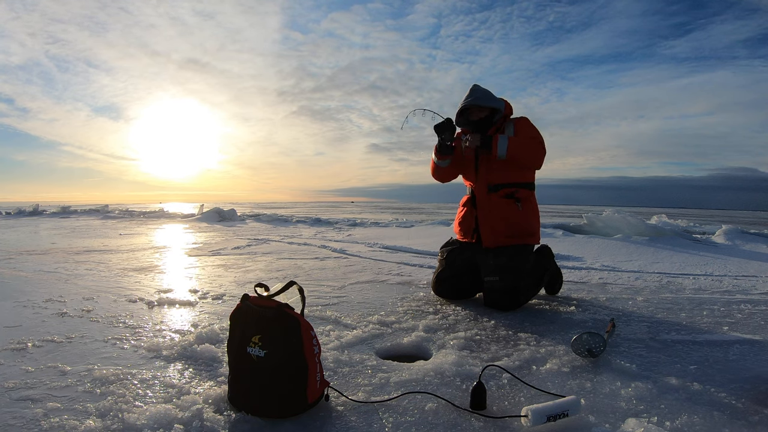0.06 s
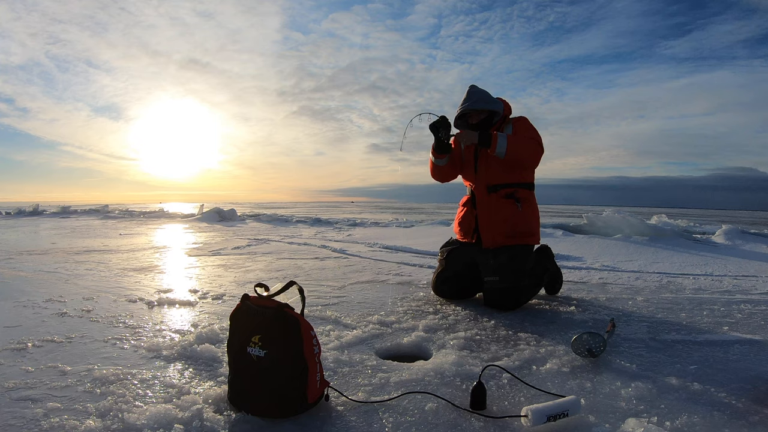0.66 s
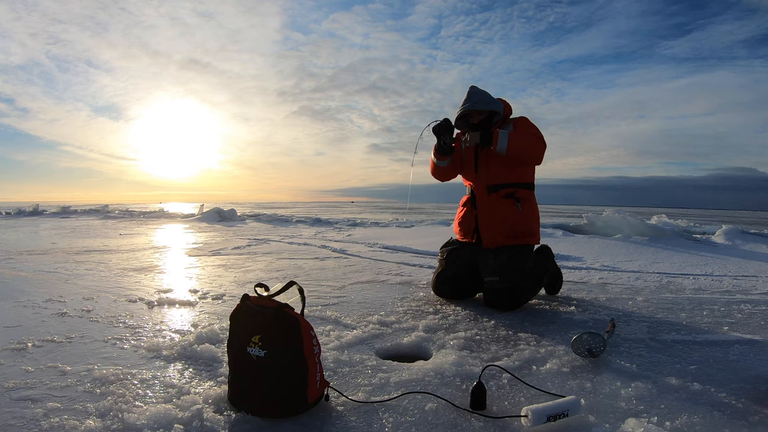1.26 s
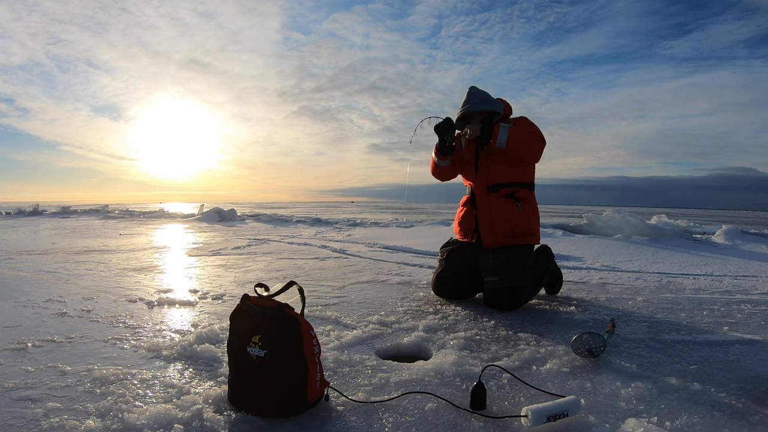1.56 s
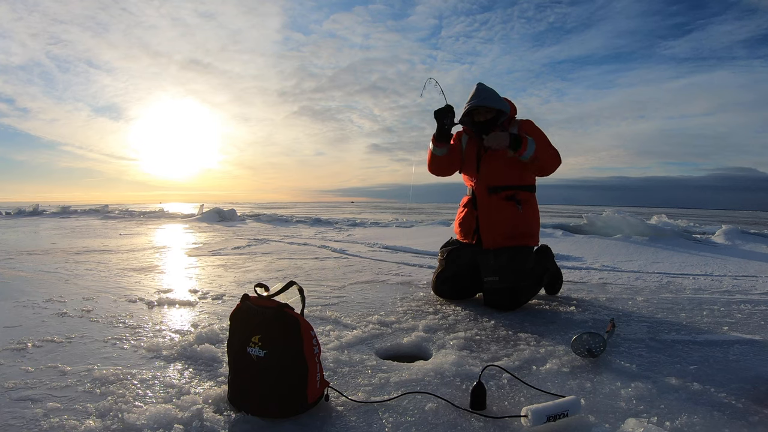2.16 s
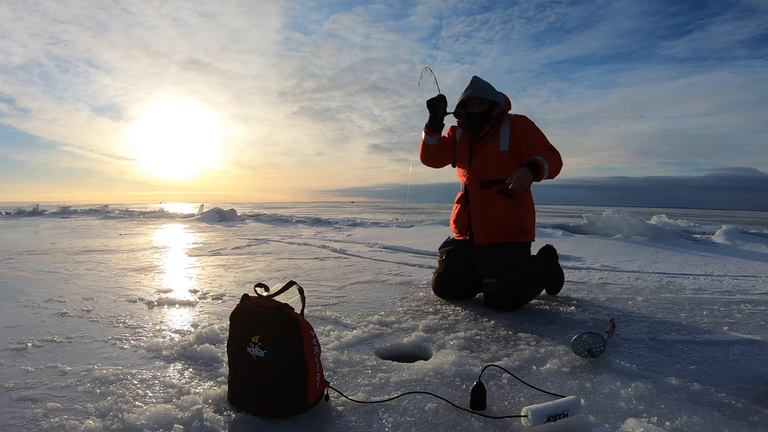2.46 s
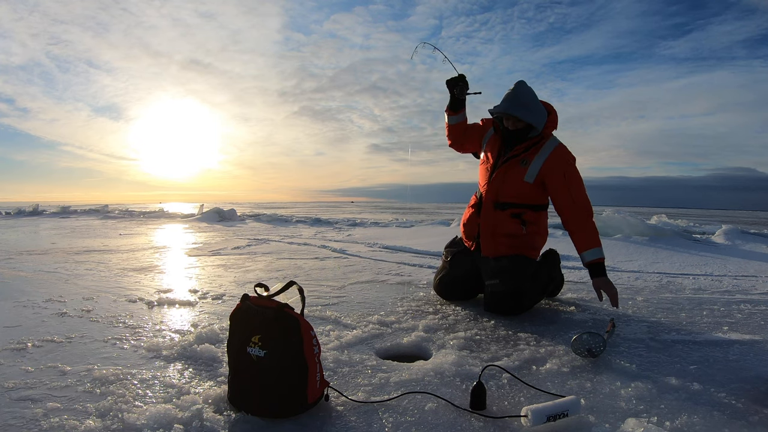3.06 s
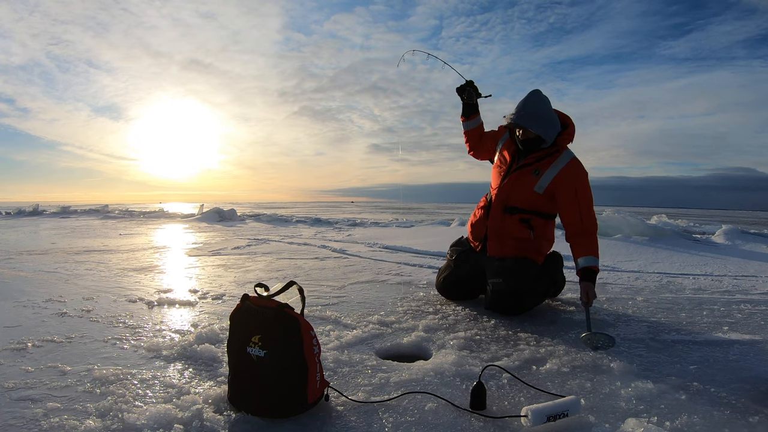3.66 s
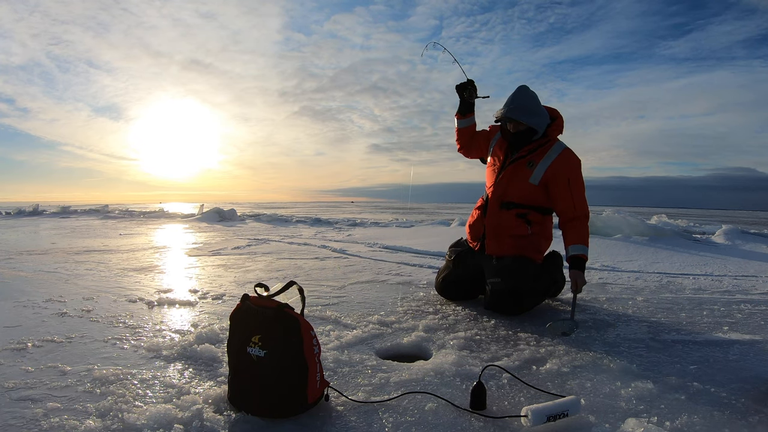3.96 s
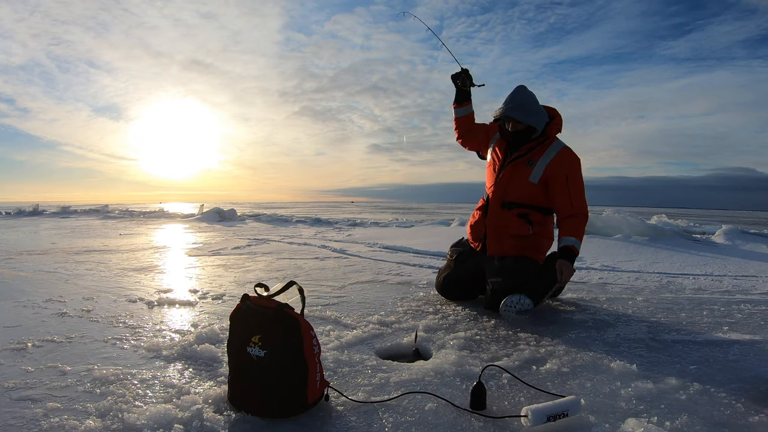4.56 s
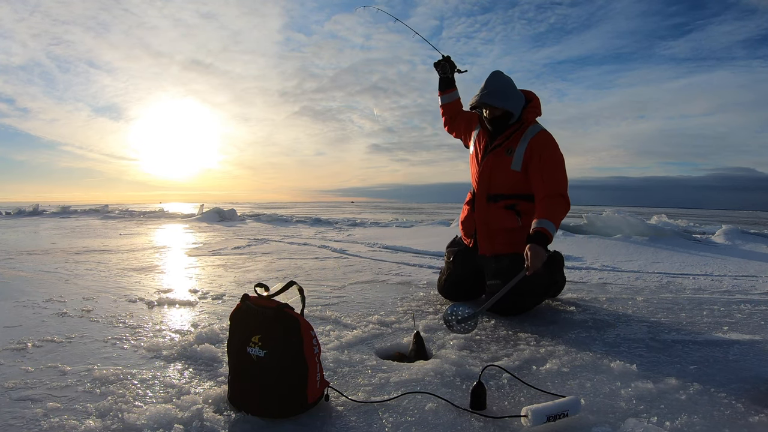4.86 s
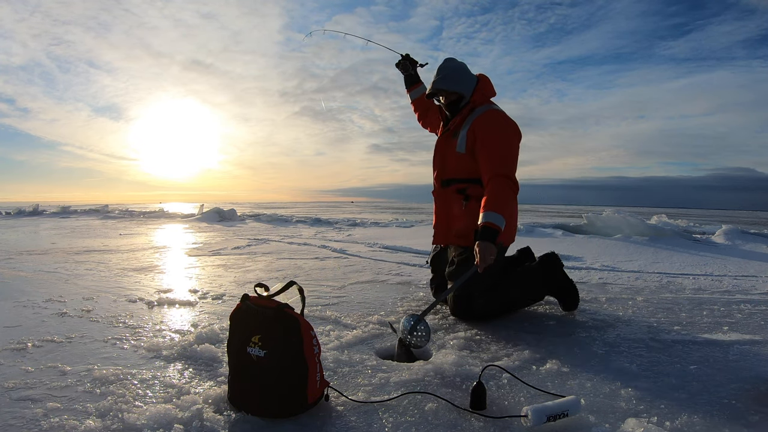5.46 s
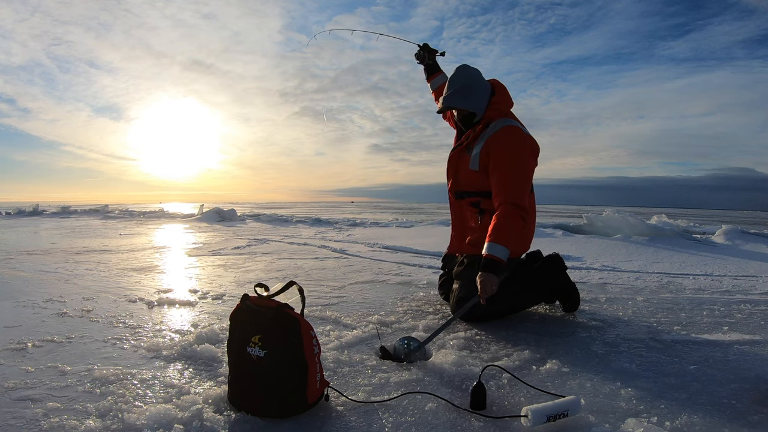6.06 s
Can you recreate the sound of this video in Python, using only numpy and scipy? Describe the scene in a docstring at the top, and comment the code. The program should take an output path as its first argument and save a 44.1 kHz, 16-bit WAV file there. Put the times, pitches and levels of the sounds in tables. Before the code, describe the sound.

Light wind rumbles on the microphone throughout, out on a frozen lake. A distant motor hums low, rising slightly in pitch, then sinking and fading after about 3.4 seconds. For the first 1.5 seconds, a nearby fishing reel whirrs and ticks quietly in short turns. From about 2.4 to 3.3 seconds, the angler's knees shift on crusted snow: grains crunch, thin plates snap sharply and packed snow thuds softly. A metal skimmer clinks brightly as it is picked up at about 3.4 seconds, and again near 4.1. From 4.7 to 5.7 seconds comes a second, fuller stretch of crunching and cracking. From about 5.8 seconds, the skimmer knocks and scrapes in the slushy hole with damped metallic taps, while water drips off it and makes small ringing bubbles until the end, at about 6.3 seconds.

```python
"""On a frozen lake, light wind rumbles on the microphone and a far motor hums throughout.
First an angler, kneeling by a hole, winds the reel a little: its gears whirr and tick.
Then the knees shift over crusted snow: grains crunch, plates of crust snap, packed snow thuds.
A metal skimmer (a scoop for slush) clinks as it is picked up, and the snow crunches again.
Last, the skimmer scrapes in the slushy hole, and water drips off it and makes ringing bubbles."""
import sys
import numpy as np
from scipy import signal
from scipy.fft import rfft, irfft
from scipy.io import wavfile
from scipy.ndimage import uniform_filter1d

SR = 44100
rng = np.random.default_rng(int(sys.argv[2]) if len(sys.argv) > 2 else 0)


def generate_wav(signal):
    """Clip the signal to [-1, 1] and save it as 16-bit WAV at the path in sys.argv[1]."""
    frames = np.transpose(np.atleast_2d(signal))
    scaled = np.clip(frames, -1, 1) * 32767
    pcm = np.round(scaled).astype(np.int16)
    wavfile.write(sys.argv[1], SR, pcm)


N = 278712
TIME = np.arange(N) / SR


def from_db(db):
    """Turn decibels into a number to multiply by."""
    return 10 ** (np.asarray(db) / 20)


def rms_one(x):
    """Scale a sound so that its average strength (rms) is 1."""
    return x / np.sqrt(np.mean(x ** 2) + 1e-20)


def in_time(rows):
    """Join (time_s, values...) rows with straight lines: one curve per value column."""
    times, *columns = np.transpose(sorted(map(tuple, rows)))
    return [np.interp(TIME, times, column) for column in columns]


def add(track, start_s, sound):
    """Mix a short sound into a track."""
    start = int(np.clip(round(start_s * SR), 0, N - 1))
    track[start:start + len(sound)] += sound[:N - start]


def keep_band(x, low_hz, high_hz):
    """Turn down everything below and above a band of pitches."""
    return signal.sosfilt(signal.butter(2, [low_hz, high_hz], "band", fs=SR, output="sos"), x)


def colour(x, spectrum, tilt_db=0, size=4096):
    """Shape a sound's tone with (pitch_hz, level_db) rows, tilted by tilt_db per octave."""
    octave = np.log2(np.maximum(np.arange(size // 2 + 1) * SR / size, 1))
    hz, db = np.transpose(spectrum)
    tilt = tilt_db * np.clip(octave - np.log2(hz).mean(), -2, 2)
    level = np.interp(octave, np.log2(hz), db) + tilt
    # Folding makes a minimum-phase filter: nothing rings ahead of a click.
    cepstrum = irfft(np.log(from_db(level)))
    fold = 1 + np.sign(size // 2 - np.arange(size)) - (np.arange(size) == 0)
    return signal.fftconvolve(x, irfft(np.exp(rfft(cepstrum * fold))))[:len(x)]


def noise(spectrum):
    """Steady noise with the given tone, at strength 1."""
    return rms_one(colour(rng.standard_normal(N + SR), spectrum)[SR:])


def wide_noise(spectrum, apart):
    """Stereo noise; apart runs from 0 (both sides alike) to 1 (each side its own)."""
    shared = noise(spectrum)
    own = np.array([noise(spectrum), noise(spectrum)])
    return np.sqrt(1 - apart) * shared + np.sqrt(apart) * own


def drift(per_s):
    """A curve that wanders around zero, to a new random value per_s times a second."""
    return np.interp(TIME * per_s, np.arange(N), rng.standard_normal(N))


def swells(events, rise_db_per_s, fall_db_per_s):
    """A level in dB: each event rises until start_s, holds, then falls; overlaps add up."""
    power = 1e-14
    for start_s, hold_s, db in events:
        before_s = np.clip(start_s - TIME, 0, 1)
        after_s = np.clip(TIME - start_s - hold_s, 0, 1)
        power = power + from_db(db - rise_db_per_s * before_s - fall_db_per_s * after_s) ** 2
    return 10 * np.log10(power)


def ring(x, hz, ring_s):
    """Each click in x starts a pure tone that fades by 60 dB in ring_s."""
    decay = from_db(-60 / (ring_s * SR))
    angle = 2 * np.pi * min(hz, SR / 2 - 1) / SR
    return signal.lfilter([0, np.sin(angle)], [1, -2 * decay * np.cos(angle), decay ** 2], x + 1e-18)


def grains(per_s, spread_db, clump_db, size=3000):
    """Random clicks of uneven size, in clumps; their average level is evened out."""
    sizes = from_db(spread_db * np.minimum(rng.exponential(1, N), 4)) * rng.choice([-1, 1], N)
    clicks = sizes * (rng.random(N) < per_s / SR) * from_db(clump_db * drift(160))
    return clicks / np.sqrt(np.abs(uniform_filter1d(clicks ** 2, size=size)) + 0.00042)


def struck(tones, contacts, focus_db, lead_db, grit_db, uneven_db, wet_sag=0.0325, size=8000):
    """Each contact is a scuff of tiny hits that favours one tone; slush lowers and damps the ring."""
    out, t = np.zeros(N), np.arange(size) / SR
    for start_s, db, lead_hz, scuff_s, wet in contacts:
        scuff = rng.standard_normal(size) * np.exp(-t / scuff_s) * (rng.random(size) < .3)
        octaves_off = np.abs(np.log2(np.array(tones)[:, 0] / lead_hz))
        drive_db = lead_db * (octaves_off == octaves_off.min()) - focus_db * octaves_off
        drive_db += uneven_db * rng.standard_normal(len(tones))
        metal = 0
        for (hz, tone_db, ring_s), drive in zip(tones, drive_db):
            tone = ring(scuff, hz * (1 - wet_sag * wet), ring_s * np.exp(-wet))
            metal += from_db(tone_db + drive) * rms_one(tone)
        grit = keep_band(scuff, lead_hz / 3, min(lead_hz * 2, SR / 3))
        clink = rms_one(metal) + from_db(grit_db) * rms_one(grit)
        add(out, start_s, from_db(db) * clink / np.abs(clink).max())
    return out


def many_paths(x, level_db, fade_s, size):
    """A sound reaches each side by its own tiny echoes, which fade by 60 dB in fade_s."""
    paths = rng.standard_normal((2, size)) * from_db(-60 * np.arange(size) / SR / fade_s)
    paths /= np.sqrt(np.sum(paths[0] ** 2))
    return from_db(level_db) * signal.fftconvolve(x[None], paths)[:, :N]


def ice_echo(x, treble_hz=6500):
    """Rough ice throws back a brief wash of treble, different on each side."""
    treble = signal.sosfilt(signal.butter(1, treble_hz, "high", fs=SR, output="sos"), x)
    return many_paths(treble, level_db=-11, fade_s=0.045, size=4000)


def microphone_ports(x):
    """The microphone has two openings: the left hears less, and its resonances delay some treble."""
    # Resonances of the left opening: pitch_hz, width_hz
    resonances = [(9100, 220), (11800, 2940)]
    # Balance between the openings: pitch_hz, left_minus_right_db
    balance = [(60, -2.5), (200, -2), (380, -3), (700, -5), (2400, -4.7), (4400, -3.3), (7500, -.5),
               (10000, -5), (15000, -5)]
    left = x
    for hz, width_hz in resonances:
        decay = np.exp(-np.pi * width_hz / SR)
        poles = [1, -2 * decay * np.cos(2 * np.pi * hz / SR), decay ** 2]
        left = signal.lfilter(poles[::-1], poles, left)
    left = colour(left, [(hz, db / 2) for hz, db in balance])
    right = colour(x, [(hz, -db / 2) for hz, db in balance])
    return np.array([left, right])


def air(wind_db=4.0, wind_pan_db=2.0, lumpy_db=3.0, hiss_db=-73, hiss_pan_db=3.0):
    """A lumpy breeze and its gusts buffet the microphone, more on the right, over a faint hiss."""
    # The breeze between gusts: time_s, level_db
    breeze_levels = [(0, -57.5), (1.8, -52), (3.1, -54.5), (4.0, -53.5), (5.2, -66), (5.8, -60), (6.2, -52)]
    # Gusts: start_s, hold_s, level_db
    gust_events = [(.08, 0.074, -42.5), (.7, 0.09, -47), (1.1, 0.24, -49), (2.23, 0.054, -45.5),
                   (2.55, .23, -48), (3.66, 0.055, -51.5), (4.14, 0.29, -46.5), (5.39, 0.2, -52.5)]
    # Tone of the wind: pitch_hz, level_db
    wind_tone = [(15, 0), (28, -1.5), (62, 4.5), (105, 1.5), (150, -11), (250, -14.5), (500, -64)]
    # Tone of the hiss: pitch_hz, level_db
    hiss_tone = [(590, -12), (1000, -1.5), (1350, -19), (1480, -3.5), (2010, -21), (4700, -19), (5040, -16),
                 (6410, -18), (7530, -8), (8940, -25), (15500, -67)]
    breeze = from_db(in_time(breeze_levels)[0] + lumpy_db * drift(8.3))
    gusts = from_db(swells(gust_events, rise_db_per_s=283, fall_db_per_s=174))
    wind = np.hypot(breeze, gusts) * wide_noise(wind_tone, apart=0.54)
    hiss = wide_noise(hiss_tone, apart=1.0)
    side = np.array([[-1], [1]])   # left, right
    return from_db(wind_db + wind_pan_db * side) * wind + from_db(hiss_db + hiss_pan_db * side) * hiss


def far_rumble():
    """A low rumble from across the open lake gently rises and falls."""
    # Strength of the rumble: time_s, level_db
    levels = [(0, -51.5), (.7, -53.5), (2, -48.5), (3.2, -51.5), (4, -51), (4.6, -50.5), (6.32, -52)]
    # Its tone: pitch_hz, level_db
    tone = [(40, -14), (110, 1.5), (200, -0.5), (300, -9), (420, -18), (750, -24.5), (1100, -47.5),
            (2500, -53.5)]
    return from_db(in_time(levels)[0]) * noise(tone)


def far_motor(waver=0.0039, flutter_db=-0.1):
    """A far motor slowly gains speed, then slows and fades; the air makes its tones waver."""
    # The motor's hum: time_s, pitch_hz, main_level_db, upper_level_db
    hum = [(0, 160, -58, -77), (.3, 162.5, -46, -75), (.75, 164, -44.5, -56), (1.3, 166.5, -42, -55),
           (1.9, 168.5, -47, -53.5), (2.4, 170, -46, -59), (2.9, 172, -46, -62.5), (3.3, 174.5, -47.5, -59),
           (3.6, 164, -63.5, -61), (4.15, 159, -52, -71), (4.6, 150, -64.5, -63), (6.32, 148, -62, -67.5)]
    # Its upper tones: ratio_to_main_pitch, level_db
    upper_tones = [(1.385, -4), (1.63, -1)]
    hz, main_db, upper_db = in_time(hum)
    tones = [(1, main_db)] + [(ratio, upper_db + db) for ratio, db in upper_tones]
    phase = 2 * np.pi * np.cumsum(hz * (1 + waver * drift(12))) / SR
    return np.sqrt(2) * sum(from_db(db + flutter_db * drift(9.3)) * np.sin(ratio * phase)
                            for ratio, db in tones)


def reel(whirr_db=-6.0, rattle_db=-8.5, rattle_hz=2500, rattle_focus_db=14, tick_cycles=16):
    """As the handle turns, gears whirr and their teeth set the reel ringing; at times it ticks."""
    # Ticks and clacks: start_s, level_db, favoured_pitch_hz
    tick_events = [(.052, -48.5, 9250), (.088, -55, 2400), (.373, -51, 9250), (0.397, -49, 2400),
                   (.487, -46.5, 8900), (.5995, -47, 8900), (.8265, -46.5, 8900), (1.06, -36, 2400),
                   (1.125, -44.5, 2400), (1.1553, -49, 9900), (1.245, -45, 2400), (1.3603, -42.5, 9250)]
    # Tones the reel rings with: pitch_hz, level_db, ring_s
    tones = [(900, 9, 0.035), (1250, -17, 0.025), (1710, -15, 0.015), (2400, -7, 0.012), (3040, -10, 0.12),
             (3890, -10, 0.032), (5561, -10.5, 0.083), (6400, -12, .02), (8900, -5, 0.028),
             (9250, -16, 0.033), (9900, -26, .02)]
    # Tone of the gears' whirr: pitch_hz, level_db
    whirr_tone = [(700, -22), (1250, -16), (2000, -11.5), (2280, -3), (2480, 2), (2750, -11), (3700, -12),
                  (5000, -17.5), (9000, -22.5), (14000, -44)]
    # Turns of the handle: start_s, hold_s, level_db
    turns = [(.09, 0.31, -63), (.45, 0.19, -65), (1.04, .23, -62), (1.32, 0.24, -69.5)]
    contacts = [(start_s, db, hz, tick_cycles / hz, 0) for start_s, db, hz in tick_events]
    ticks = struck(tones, contacts, focus_db=15.0, lead_db=4, grit_db=-8.5, uneven_db=2)
    whirr = rms_one(colour(grains(per_s=560, spread_db=0.0, clump_db=3.5), whirr_tone))
    teeth = grains(per_s=130, spread_db=0.0, clump_db=7.0)
    rattle = 0
    for hz, db, ring_s in tones:
        octaves_off = abs(np.log2(hz / rattle_hz))
        rattle += from_db(db - rattle_focus_db * octaves_off) * rms_one(ring(teeth, hz, ring_s))
    turning = from_db(swells(turns, rise_db_per_s=258, fall_db_per_s=204))
    return ticks + turning * (from_db(whirr_db) * whirr + from_db(rattle_db) * rms_one(rattle))


def bubbles(onset_s=0.0015, wobble=0.021, trickle_db=-38, low_hz=520, high_hz=5000, size=6000):
    """Bubbles ring, wobble and rise in pitch near the surface; drips off the skimmer add small ones."""
    # Big bubbles in the hole: start_s, level_db, pitch_hz, rise_octaves_per_s, ring_s
    big_bubbles = [(5.801, -36.5, 1050, 5, 0.058), (5.88, -36, 1160, 12, 0.1),
                   (5.94, -50.5, 2070, 16, 0.19), (6.176, -33, 1160, 3.6, 0.056),
                   (6.199, -36, 1720, 14, 0.028), (6.231, -30, 560, 3.1, 0.025),
                   (6.242, -32, 2650, 4, 0.033), (6.275, -35, 576, 5.4, .031), (6.3, -40.5, 650, 5, 0.029)]
    out, t = np.zeros(N), np.arange(size) / SR
    trickle = []
    for when, loud, small in rng.random((34, 3)):
        hz = low_hz * (high_hz / low_hz) ** small
        trickle.append((6.14 + .18 * when, trickle_db + 10 * (loud - .5), hz, 7, 36 / hz))
    for start_s, db, hz, rise, ring_s in big_bubbles + trickle:
        fade = from_db(db - 60 * t / ring_s) * (1 - np.exp(-t / onset_s))
        unsteady = 1 + wobble * np.interp(t * 300, np.arange(size), rng.standard_normal(size))
        pitch_hz = hz * unsteady * 2 ** (rise * t)
        add(out, start_s, fade * np.sin(2 * np.pi * np.cumsum(pitch_hz) / SR))
    return out


def skimmer(bounce_s=0.021, bounce_db=-19, loss_db=2):
    """The metal scoop is picked up, knocked on ice and dipped in slush; each contact bounces twice."""
    # Tones the scoop rings with: pitch_hz, level_db, ring_s
    tones = [(992, 5.5, 0.16), (1217, -5.5, 0.068), (2266, -7, 0.063), (2560, -6, 0.091),
             (3560, -7.5, 0.04), (4120, -10, 0.032), (4700, -0.5, 0.061), (4570, -6, 0.047),
             (5000, -4, 0.014), (5330, -12, .04), (6150, -8.5, 0.04), (7095, -16, 0.099), (7316, -31, .075),
             (7461, 1, 0.033), (7800, 4.5, 0.033), (8540, -3, 0.14), (8620, 5, 0.011), (9250, 2.5, 0.048),
             (9660, -12, 0.08), (10300, -8, 0.069), (11800, -14, .05)]
    # Its contacts: start_s, level_db, favoured_pitch_hz, scuff_s, wetness (0 to 1)
    clinks = [(3.4291, -17.5, 4740, 0.0058, 0.06), (3.4305, -17.5, 7316, 0.0049, 0.05),
              (3.52, -37, 4700, 0.017, 0.1), (3.599, -26.5, 7461, 0.0082, .02),
              (4.0776, -14.5, 7095, 0.0028, 0.07), (4.0782, -23, 2266, 0.0014, 0.03),
              (4.124, -32.5, 7461, 0.0034, 0.13), (5.389, -27.5, 4120, 0.0055, 1),
              (5.7811, -17, 3560, 0.007, 0.85), (5.838, -31, 5000, 0.013, 0.8),
              (5.916, -26.5, 6150, 0.011, 0.77), (5.981, -37, 6150, 0.014, 0.5),
              (6.018, -26.5, 6150, 0.011, .96), (6.063, -38, 4700, .006, 1),
              (6.099, -29.5, 8540, 0.0074, 0.9), (6.128, -27.5, 2560, 0.0047, .8),
              (6.145, -30.5, 4120, 0.0086, 1)]
    bounces = [(start_s + k * bounce_s * rng.uniform(.85, 1.15), db + bounce_db - k * loss_db, *touch)
               for start_s, db, *touch in clinks for k in (1, 2)]
    return struck(tones, clinks + bounces, focus_db=8.5, lead_db=10.5, grit_db=-7, uneven_db=-1.2)


def pressure(shuffle_thud_db=-4, shuffle_splinter_db=-5):
    """Crunch, thud and splinter levels in dB: pressed crust gives way fast and settles more slowly."""
    # A knee or the skimmer presses the crust: start_s, hold_s, crunch_db, thud_db, splinter_db
    presses = [(0.177, .12, -68.5, -70, -72.5), (0.72, 0.12, -69.5, -72, -75), (2.426, .1, -50, -51, -58.5),
               (2.569, 0.041, -29, -35.5, -42), (2.638, 0.123, -49.5, -44.5, -58.5),
               (2.771, 0.049, -38, -41, -48), (2.851, 0.07, -35, -39, -41.5),
               (2.963, 0.081, -42, -47.5, -56), (3.068, 0.15, -49, -49.5, -58.5),
               (3.254, 0.022, -42.5, -49.5, -61), (3.399, 0.085, -53.5, -59, -54.5),
               (3.648, 0.049, -55, -72, -83), (4.762, 0.005, -33, -40.5, -68),
               (4.808, .12, -34.5, -41.5, -50), (4.949, 0.051, -33, -36.5, -45),
               (5.028, 0.08, -41, -41.5, -51.5), (5.125, 0.12, -33, -39.5, -39.5),
               (5.25, 0.059, -35.5, -42, -45.5), (5.443, 0.015, -43, -34, -53),
               (5.486, 0.012, -34.5, -37, -43), (5.526, 0.078, -42.5, -43, -44),
               (5.617, 0.11, -44.5, -43.5, -51.5), (5.883, 0.043, -52.5, -51.5, -57.5),
               (6.161, 0.18, -53, -56, -58)]
    # Light shuffling between presses: time_s, level_db
    shuffle = [(1.6, -80.5), (2.0, -74), (2.36, -64), (3.2, -63.5), (3.8, -63), (3.98, -65.5), (4.35, -68),
               (4.6, -63.5), (4.72, -55.5), (5.36, -57), (5.77, -63), (6.05, -54), (6.2, -55.5)]
    shuffle_db = in_time(shuffle)[0]
    start_s, hold_s, *columns = np.transpose(presses)
    curves = []
    for db, offset_db in zip(columns, (0, shuffle_thud_db, shuffle_splinter_db)):
        pressed_db = swells(zip(start_s, hold_s, db), rise_db_per_s=654, fall_db_per_s=451)
        curves.append(20 * np.log10(np.hypot(from_db(pressed_db), from_db(shuffle_db + offset_db))))
    return curves


def loose_plates(cycles=28, count=24):
    """Loose plates of crust rub and ring briefly, each at a pitch of its own."""
    clicks = grains(per_s=500, spread_db=5.0, clump_db=1.0)
    plate_hit = rng.integers(0, count, N)
    pitches_hz = np.geomspace(1100, 4000, count) * np.exp(0.09 * rng.standard_normal(count))
    return rms_one(sum(ring(clicks * (plate_hit == k), hz, cycles / hz)
                       for k, hz in enumerate(pitches_hz)))


def crunch(crunch_db, thud_db, splinter_db, tilts_db=(-2.5, 0, 2.5), plates_db=-6):
    """Dull, middling and bright grains break under the knees and shed splinters; packed snow thuds."""
    # Tone of the coarse grains: pitch_hz, level_db
    grain_tone = [(200, -30), (500, -8), (1000, -1), (1500, 1), (2200, 3), (3100, 4), (4000, -4.5),
                  (5000, -14), (7000, -16), (10000, -41), (15000, -38)]
    # Tone of the fine ice splinters: pitch_hz, level_db
    splinter_tone = [(2000, -37), (4000, 7.5), (5500, 4), (7000, 0.5), (8600, 3.5), (10000, -10),
                     (12500, -8.5), (15000, -27)]
    # Tone of the packed snow below: pitch_hz, level_db
    thud_tone = [(90, -26.5), (170, 6), (280, -0.5), (480, 0.5), (750, -0.5), (1200, -5), (3000, -39.5)]
    per_s = 1300 * from_db((crunch_db - crunch_db.max()) / 2) + 550   # light pressure breaks fewer
    breaks = [grains(per_s, spread_db=4.0, clump_db=3.5) for _ in tilts_db]
    coarse = sum(rms_one(colour(clicks, grain_tone, tilt)) for clicks, tilt in zip(breaks, tilts_db))
    crust = rms_one(coarse) + from_db(plates_db) * loose_plates()
    splinters = rms_one(colour(breaks[2] + grains(3500, spread_db=0.0, clump_db=1.0), splinter_tone))
    packed = rms_one(colour(breaks[0] + grains(810, spread_db=1.5, clump_db=8.0), thud_tone))
    return from_db(crunch_db) * crust + from_db(splinter_db + 1) * splinters + from_db(thud_db) * packed


def snow_patch(snow):
    """Grains break all over a patch of snow, so some of their treble reaches each side its own way; a brief
    wash of middle pitches also differs between the sides."""
    middle = many_paths(keep_band(snow, 500, 1340), level_db=-10.5, fade_s=0.05, size=1500)
    treble = many_paths(keep_band(snow, 7600, 14000), level_db=-4.5, fade_s=0.013, size=1500)
    return middle + treble


def small_cracks(crunch_db, over_db=15.0, follows=0.98, spread_db=8, low_hz=1600, high_hz=3600):
    """Rows for small plates that snap at random as the angler moves, louder under more pressure."""
    when, loud, small = rng.random((120, 3)).T
    start_s = np.interp(when, [0, 1], [1.75, 5.78])
    pressed_db = np.interp(start_s, TIME, crunch_db)
    db = follows * pressed_db + (1 - follows) * np.median(pressed_db) + over_db + spread_db * (loud - .5)
    return list(zip(start_s, db, low_hz * (high_hz / low_hz) ** small))


def cracks(crunch_db, cycles=4.45, crumble_db=-23, crumble_s=0.003, edge_ratio=2.38, size=1400):
    """A plate of crust snaps with a very short ring, and crumbs follow for a few milliseconds."""
    # Big plates snapping: start_s, level_db, pitch_hz
    big_cracks = [(1.842, -49, 2600), (2.431, -30, 2670), (2.515, -24, 2400), (2.5495, -19, 2520),
                  (2.799, -18.5, 1660), (2.8411, -9.5, 2840), (2.8412, -14.5, 795), (2.8781, -14, 2840),
                  (2.9075, -9, 2730), (2.9102, -12, 2500), (2.9321, -17, 620), (2.9323, -10, 2400),
                  (3.097, -26, 1460), (3.1083, -15, 2180), (3.1362, -16.5, 2400), (3.3738, -30.5, 2400),
                  (3.4754, -26, 2770), (3.7778, -26.5, 2680), (3.819, -30.5, 2960), (3.883, -30.5, 1890),
                  (4.1617, -36.5, 900), (4.7446, -20, 2400), (4.9317, -20, 2480), (4.9492, -13, 3220),
                  (4.984, -12, 3000), (4.994, -20.5, 605), (5.1045, -17.5, 2610), (5.118, -14, 6650),
                  (5.189, -7.5, 2650), (5.196, -7.5, 2410), (5.2167, -8.5, 2920), (5.437, -25.5, 1100),
                  (5.4856, -15.5, 1100), (5.501, -7.5, 2400), (5.5261, -10.5, 3140), (5.5567, -9, 2400),
                  (5.5762, -6, 3000), (5.7414, -23, 2940), (5.8545, -24.5, 3500), (6.002, -26.5, 2520),
                  (6.1742, -22, 1980)]
    out, t = np.zeros(N), np.arange(size) / SR
    for start_s, db, hz in big_cracks + small_cracks(crunch_db):
        crumbs = rng.standard_normal(size) * (rng.random(size) < .3) * np.exp(-t / crumble_s)
        force = (t == 0) + from_db(crumble_db) * crumbs
        snap = np.diff(ring(force, hz, cycles / hz), prepend=0)
        snap = keep_band(snap, 300, min(edge_ratio * hz, SR / 3))
        add(out, start_s, from_db(db) * snap / np.abs(snap).max())
    return out


def scene():
    """Mix the near sounds and their echoes with the far sounds and the air, in stereo."""
    crunch_db, thud_db, splinter_db = pressure()
    snow = crunch(crunch_db, thud_db, splinter_db)
    near = [snow, cracks(crunch_db), skimmer(), bubbles() + reel()]
    patch = snow_patch(snow)
    far = far_motor() + far_rumble()
    echoes = sum(ice_echo(source) for source in near)
    return microphone_ports(sum(near) + far) + patch + echoes + air()


def record(dry, dull_hz=11500, cutoff_hz=15800):
    """The microphone dulls the top octave, and the very top is cut steeply."""
    dulled = signal.sosfilt(signal.butter(3, dull_hz, fs=SR, output="sos"), dry)
    return signal.sosfilt(signal.ellip(10, .1, 80, cutoff_hz, fs=SR, output="sos"), dulled)


dry = scene()
out = record(dry)
generate_wav(out)
```